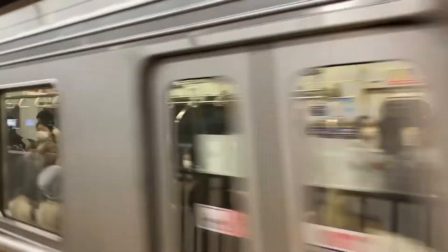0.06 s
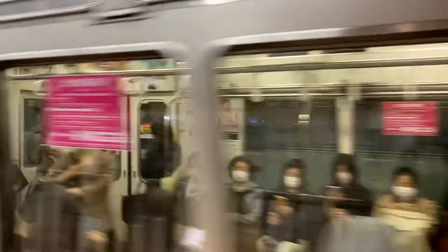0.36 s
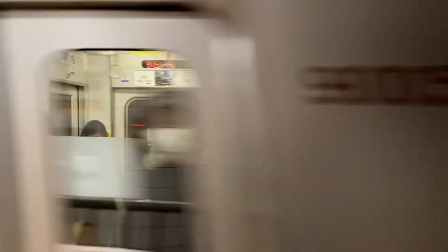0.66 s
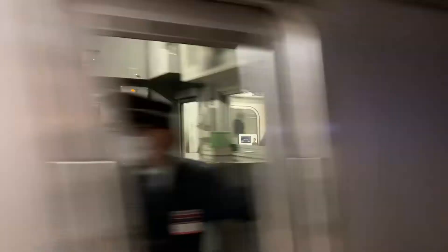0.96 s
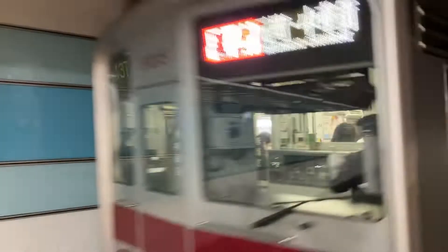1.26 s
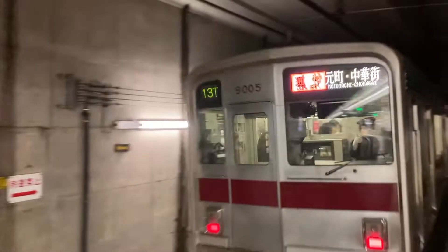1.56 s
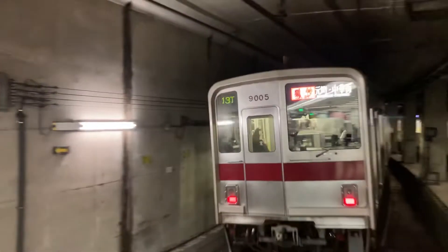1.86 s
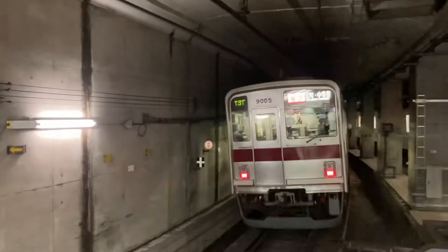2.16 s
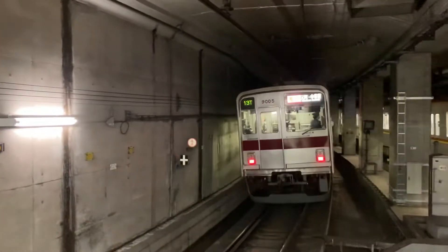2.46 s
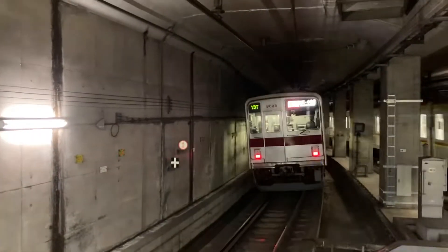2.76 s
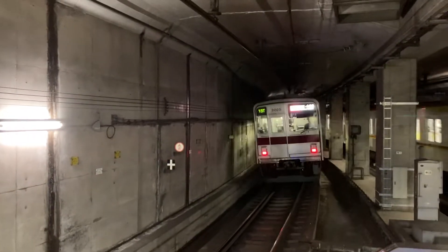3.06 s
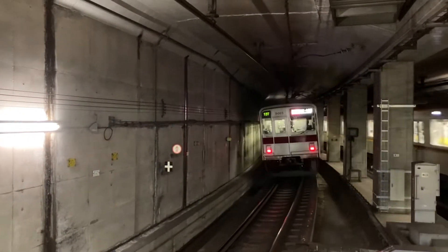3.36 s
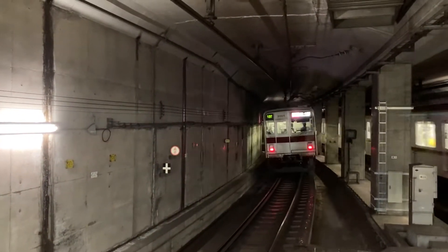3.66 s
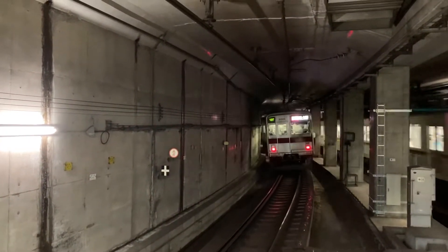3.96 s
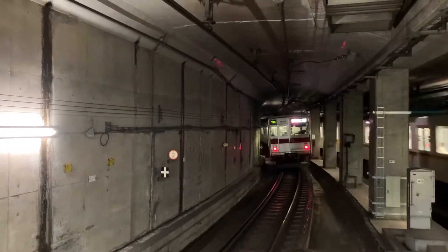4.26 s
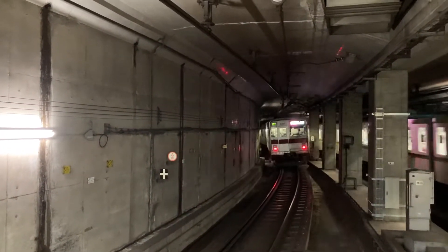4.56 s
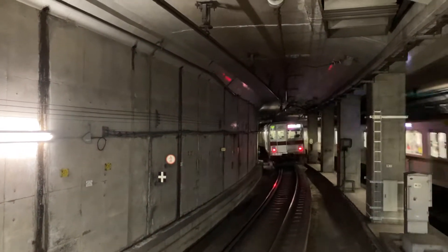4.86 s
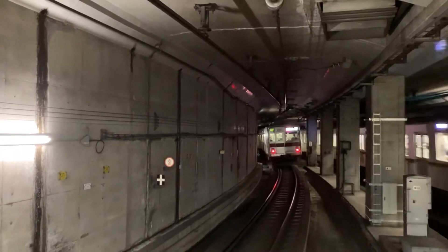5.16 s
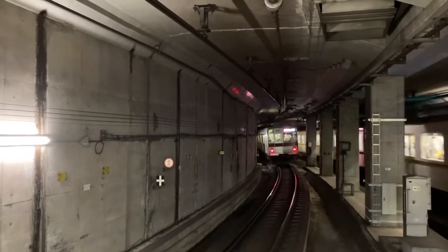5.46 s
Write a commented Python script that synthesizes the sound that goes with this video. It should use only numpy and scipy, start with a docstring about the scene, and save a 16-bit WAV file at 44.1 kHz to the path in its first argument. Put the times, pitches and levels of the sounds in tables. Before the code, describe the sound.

Roaring wheels, a pulsing motor hum and thin hiss echo underground as a subway train pulls away, dull thuds following.

```python
"""Electric train leaving an underground platform.

The train passes close by and recedes into the tunnel. Its wheels rumble and roar unevenly on the rails
and the track bed shudders. The drive's wavering hum near 520 Hz and its faint whine swell and sink in
the concrete tube, while a thin hiss arrives from the right. The tunnel mouth drones briefly behind
the last car; dull low thuds and brief, higher swells sound as the train draws away."""
import sys
import numpy as np
from scipy import signal
from scipy.fft import rfft, irfft, next_fast_len
from scipy.io import wavfile
from scipy.ndimage import uniform_filter1d

SR = 44100
rng = np.random.default_rng(int(sys.argv[2]) if len(sys.argv) > 2 else 0)


def waveform_to_disk(signal):
    """Save audio, clipped to [-1, 1], as 16-bit WAV at the path in sys.argv[1]."""
    frames = np.transpose(np.atleast_2d(signal))
    scaled = np.clip(frames, -1, 1) * 32767
    samples = np.round(scaled).astype(np.int16)
    wavfile.write(sys.argv[1], SR, samples)


N = 242991
TIME = np.arange(N) / SR
# The tail passes at PASS_S at a steady speed. The tunnel guides the sound: it fades slowly past REACH_M.
PASS_S, SPEED_M_PER_S, REACH_M = 1.539, 14.8, 13


def gain_of(db):
    """Decibels to a factor."""
    return 10 ** (np.asarray(db) / 20)


def unit_rms(x):
    """Scales to rms 1."""
    return x / np.sqrt(np.mean(abs(x) ** 2) + 1e-20)


def curve_at(points, hz):
    """Reads a curve on a log-frequency axis."""
    point_hz, value = np.transpose(points)
    return np.interp(np.log(hz + 1), np.log(point_hz + 1), value)


def follow(rows):
    """A fader ride at every sample."""
    return np.interp(TIME, *np.transpose(rows))


def bump(peak_s, half_s, t=TIME):
    """A smooth swell of height 1."""
    return np.exp(-((t - peak_s) / half_s) ** 2)


def doublings(t=TIME):
    """How often the distance to the train has doubled since its tail passed."""
    return np.log2(np.hypot(1, SPEED_M_PER_S * np.maximum(t - PASS_S, 0) / REACH_M))


def passing(near_db, swell_db, delay_s, half_s, loss_db, t=TIME):
    """Pass-by curve in dB: a swell delay_s after the tail passes, loss_db off per doubling of distance."""
    return near_db + swell_db * bump(PASS_S + delay_s, half_s, t) - loss_db * doublings(t)


def flutter(slow_hz, fast_hz, count=20):
    """A random waver of rms 1."""
    t = TIME[::100]
    waves = np.sin(2 * np.pi * (np.geomspace(slow_hz, fast_hz, count) * t[:, None] + rng.random(count)))
    return np.interp(TIME, t, unit_rms(waves.sum(1)))


def wavering(x, depth, slow_hz, fast_hz):
    """Lets the pitch wander; depth is the rms share of the pitch."""
    drift_s = np.cumsum(depth * flutter(slow_hz, fast_hz)) / SR
    return np.array([np.interp(TIME + drift_s, TIME, channel) for channel in x])


def steadied(x, share, size):
    """Irons out a share of a noise's chance swells, over a window of size samples."""
    power = uniform_filter1d((x ** 2).mean(0), size=size) + 1e-9
    return unit_rms(x / power ** (share / 2))


def noise_pair(hz, shape):
    """Random spectra at two microphones in a diffuse field: alike in the bass, unrelated higher up."""
    # Each row: frequency in Hz, left-right correlation.
    likeness = [(50, 0.5), (120, 0.901), (280, 0.92), (420, 0.88), (600, 0.5), (800, 0.468), (1200, 0.24),
                (1800, 0.25), (3000, -0.15), (4200, 0.317), (6000, -0.18)]
    # The mids reach the left a little late. Each row: frequency in Hz, left's phase lead in radians.
    left_lead = [(600, -0.063), (1200, -0.74), (1550, -1.9), (2300, -1.4), (3000, -0.14)]
    a, b, c, d = rng.standard_normal((4,) + shape)
    left, unrelated = a + 1j * b, c + 1j * d
    same = curve_at(likeness, hz)
    right = same * left * np.exp(-1j * curve_at(left_lead, hz)) + np.sqrt(1 - same ** 2) * unrelated
    return np.array([left, right])


def wash(spectrum, patchy_db, tilt=None, size=2048):
    """A stereo noise bed with drifting patches of colour and an optional pass-by treble tilt."""
    hop = size // 4
    hz, t = np.fft.rfftfreq(size, 1 / SR), np.arange(0, N + size, hop) / SR
    patches = rng.standard_normal((len(t), len(hz)))
    patches = unit_rms(uniform_filter1d(uniform_filter1d(patches, size=9, axis=0), size=12, axis=1))
    colour_db = curve_at(spectrum, hz) + patchy_db * patches
    if tilt:
        treble_octaves = np.log2(np.maximum(hz / 8000, 1))
        colour_db += passing(**tilt, t=t)[:, None] * treble_octaves
    skirt = np.maximum(hz / spectrum[-1][0], 1) ** -4  # 24 dB an octave above the last point
    frames = noise_pair(hz, patches.shape) * gain_of(colour_db) * skirt
    _, bed = signal.istft(frames.swapaxes(1, 2), nperseg=size, noverlap=size - hop)
    return unit_rms(bed[:, :N])


def ring(modes):
    """Resonances kept ringing by random forces."""
    count = next_fast_len(N)
    hz = np.fft.rfftfreq(count, 1 / SR)
    power = sum(gain_of(db) ** 2 / width / (1 + (2 * (hz - centre) / width) ** 2) ** 2
                for centre, width, db in modes)
    return unit_rms(irfft(noise_pair(hz, hz.shape) * np.sqrt(power), count)[:, :N])


def widened(x, side_db):
    """Stereo width: scales what the two channels do not share."""
    mid = x.mean(0)
    return mid + (x - mid) * gain_of(side_db)


def placed(x, left_db, before_db=-0.1, far_db=1.34):
    """Pans gently left with the leaving train, offset by left_db."""
    gone = .5 + .5 * np.tanh(SPEED_M_PER_S * (TIME - PASS_S) / REACH_M)
    lean_db = before_db + (far_db - before_db) * gone + left_db
    return x * gain_of([lean_db / 2, -lean_db / 2])


def rumble():
    """The low end of the rolling wheels; it widens once the car sides no longer shut out the tunnel."""
    # Each row: frequency in Hz, relative density in dB.
    spectrum = [(30, -16), (60, -7), (85, -2.5), (105, -4.5), (130, 3), (170, 0.5), (220, 4), (300, 2.5),
                (380, -11.5), (600, -44)]
    bed = steadied(wash(spectrum, patchy_db=1.5, size=4096), share=0.306, size=4000)
    bed *= gain_of(passing(-26, swell_db=0, delay_s=1.47, half_s=0.8, loss_db=1.1))
    return placed(widened(bed, side_db=-0.5 + 3.5 * doublings()), left_db=-0.77)


def roar(wheel_round_m=2.646, throb_peak_s=4.3):
    """Rough wheels roar on rough rails and, far off, throb once per turn."""
    # Each row: frequency in Hz, relative density in dB.
    spectrum = [(150, -28), (260, -11), (320, -2), (355, 4), (385, 1), (440, 6), (482, 1), (550, -4),
                (620, -10.5), (760, -30), (1100, -65.5)]
    # The roar surges briefly and unevenly.
    # Each row: peak time in seconds, boost in dB, half length in seconds.
    surges = [(0.857, 3, 0.033), (1.061, 0.5, 0.026), (1.437, 2, 0.04), (1.53, 5, 0.0344),
              (1.683, 0, 0.022), (1.811, 2.5, 0.03), (1.981, 0.5, 0.028), (2.193, 4, 0.019),
              (2.436, 3.5, 0.04), (3.267, 1.5, 0.058)]
    surge_db = sum(db * bump(peak_s, half_s) for peak_s, db, half_s in surges)
    turns = (TIME - throb_peak_s) * SPEED_M_PER_S / wheel_round_m
    throb_db = 2.5 * np.clip(doublings() - 1, 0, 1) * np.cos(2 * np.pi * turns)
    level_db = passing(-21.5, swell_db=2.5, delay_s=0.1, half_s=0.87, loss_db=0.85)
    bed = steadied(wash(spectrum, patchy_db=2.0), share=0.53, size=4000)
    return placed(bed, left_db=0.71) * gain_of(level_db + throb_db + surge_db)


def treads():
    """The wheel treads give the top of the roar, which fades soonest."""
    # Each row: frequency in Hz, relative density in dB.
    spectrum = [(420, -24.5), (540, 0), (610, 0.5), (720, -2), (850, -8.5), (1200, -16)]
    level_db = passing(-26.5, swell_db=2.8, delay_s=-0.1, half_s=0.1, loss_db=3.4)
    return placed(wash(spectrum, patchy_db=1.5), left_db=0.71) * gain_of(level_db)


def rasp():
    """The bright, gritty edge of wheel on rail."""
    # Each row: frequency in Hz, relative density in dB.
    spectrum = [(400, -25), (600, 3.5), (740, 1), (900, -1), (1050, -5), (1250, -6), (1520, -10),
                (1750, -12), (2300, -12.5), (2900, -16), (3500, -21), (5000, -23.5), (6500, -32.5),
                (8000, -66)]
    level_db = passing(-25, swell_db=1.1, delay_s=-0.55, half_s=0.55, loss_db=1.54)
    return placed(wash(spectrum, patchy_db=1.85), left_db=0.97) * gain_of(level_db)


def shudder():
    """The weight of the cars shakes the track bed: a narrow sub layer with a few slow heaves."""
    # Each row: frequency in Hz, relative density in dB.
    spectrum = [(15, -48), (28, -19), (45, -7.5), (62, 1), (85, -4)]
    # Each row: peak time in seconds, level of the added heave in dB, half length in seconds.
    heaves = [(.85, -44, 0.3), (2.0, -39.5, 0.18), (3.948, -33, 0.23), (5.25, -46, .12)]
    sub = widened(wash(spectrum, patchy_db=0.5, size=4096), side_db=-7)
    strength = gain_of(-44) + sum(gain_of(db) * bump(peak_s, half_s) for peak_s, db, half_s in heaves)
    return sub * strength * gain_of(2.2 * flutter(slow_hz=2.12, fast_hz=4.6))


def hum():
    """The drive hums near 520 Hz; close tones, smeared by the tunnel, waver and beat together."""
    # Each row: pitch in Hz, width in Hz, relative level in dB.
    modes = [(511.64, 15, -2.5), (524.5, 37, 3), (546.2, 11.4, -4), (563, 58, -8.5)]
    # The hum swells and sinks. Each row: time in seconds, level in dB.
    ride = [(0, -23.5), (.28, -22.5), (.43, -30), (.53, -18.5), (.66, -31), (.75, -14.5), (.93, -27),
            (1.07, -16.5), (1.17, -34), (1.29, -19), (1.42, -26), (1.6, -23), (1.72, -18), (1.84, -22.5),
            (1.98, -13.5), (2.16, -33), (2.27, -21), (2.42, -22.5), (2.63, -22), (2.75, -28), (2.82, -22),
            (2.95, -23), (3.06, -20.5), (3.14, -25.5), (3.28, -22), (3.36, -31), (3.44, -23.5), (3.65, -20),
            (3.8, -19), (3.89, -29.5), (4.02, -22.5), (4.15, -15.5), (4.25, -20.5), (4.35, -18.5),
            (4.44, -27.5), (4.56, -20), (4.7, -21.5), (4.78, -28), (4.93, -18.5), (5.02, -27), (5.1, -24),
            (5.23, -21), (5.31, -27.5), (5.44, -18.5), (5.51, -25.5)]
    tone = wavering(ring(modes), depth=0.0058, slow_hz=2, fast_hz=7)
    return placed(steadied(tone, share=0.85, size=6000), left_db=-0.5) * gain_of(follow(ride))


def whine():
    """The drive's upper partials: a main band flares and wobbles between two fainter ones."""
    # The three bands. Each row: pitch in Hz, width in Hz, relative level in dB.
    low_modes = [(2078, 92, 0)]
    main_modes = [(2553, 61, 0.003), (2619, 47, 0)]
    high_modes = [(3115, 70, 0)]
    # The main band's flares. Each row: time in seconds, level in dB.
    ride = [(0, -37), (.4, -43), (.85, -41), (1.2, -44), (1.29, -35.5), (1.37, -39.5), (1.45, -38.5),
            (1.8, -36), (1.95, -42.5), (2.35, -45.5), (2.56, -37.5), (2.65, -37.5), (2.85, -41),
            (3.05, -42.5), (3.35, -40.5), (3.47, -40.5), (3.55, -38), (3.85, -41), (4.03, -39), (4.14, -39),
            (4.3, -36.5), (4.43, -42), (4.5, -35), (4.6, -40), (4.67, -40), (4.75, -35.5), (4.82, -42),
            (5.15, -39), (5.51, -42)]
    main = steadied(ring(main_modes), share=0.86, size=6000)
    main *= gain_of(follow(ride) + 1.4 * flutter(slow_hz=6, fast_hz=17))
    low_db = passing(-41.5, swell_db=1, delay_s=0.5, half_s=2.3, loss_db=0.47)
    low = ring(low_modes) * gain_of(low_db + 1.73 * flutter(slow_hz=4, fast_hz=9.6))
    high = ring(high_modes) * gain_of(passing(-45.3, swell_db=1, delay_s=2, half_s=0.5, loss_db=2.11))
    return placed(wavering(low + main + high, depth=0.0049, slow_hz=2.5, fast_hz=9), left_db=-0.5)


def rails():
    """The rails sing faintly in their own modes and keep singing behind the train."""
    # Each row: pitch in Hz, width in Hz, relative level in dB.
    modes = [(1049, 95, 3.5), (1377, 89, -3), (1546.3, 140, -3), (1900, 260, -6.5)]
    level_db = passing(-36.3, swell_db=3, delay_s=-0.2, half_s=0.35, loss_db=-0.5)
    return placed(ring(modes), left_db=1.0) * gain_of(level_db)


def hiss(lag_ms=0.237, port_turns=0.31, scatter_share=0.0267):
    """A thin hiss from the right reaches the left microphone later, with a little scatter."""
    # Each row: frequency in Hz, relative density in dB.
    spectrum = [(2500, 3.5), (5000, 3), (6200, 5.3), (7200, 6.8), (8300, 6), (9700, 4.3), (11000, 2.4),
                (16000, -8)]
    # Each row: time in seconds, level in dB.
    ride = [(0, -42.5), (.8, -40), (1.15, -41.5), (1.4, -39.5), (1.75, -42), (2.3, -45), (3, -42.5),
            (4.05, -42.5), (4.5, -47), (5, -49), (5.51, -47)]
    # Brighter as the tail passes, duller with distance, in dB per octave above 8 kHz.
    tilt = dict(near_db=0, swell_db=6, delay_s=-0.2, half_s=0.4, loss_db=3.5)
    right, scatter = (wash(spectrum, patchy_db=1.44, tilt=tilt, size=512)[0] for _ in range(2))
    # The microphone ports add a phase shift of their own.
    lag_turns = np.fft.rfftfreq(N, 1 / SR) * lag_ms / 1000 + port_turns
    late = irfft(rfft(right) * np.exp(-2j * np.pi * lag_turns), N)
    left = np.sqrt(1 - scatter_share) * late + np.sqrt(scatter_share) * scatter
    return steadied(np.array([left, right]), share=0.5, size=8000) * gain_of(follow(ride))


def drone(start_s=1.778, attack_s=0.4, fade_at_s=3.15, release_s=0.16):
    """The tunnel mouth's hollow low note rises after the last car enters, holds and dies away."""
    # Each row: pitch in Hz, width in Hz, relative level in dB.
    modes = [(182, 64, -1), (227.3, 31, 2)]
    swell = np.clip(np.minimum((TIME - start_s) / attack_s, 1 - (TIME - fade_at_s) / release_s), 0, 1)
    note = steadied(widened(ring(modes), side_db=-3), share=0.44, size=4000)
    return note * swell * gain_of(-32.3)


def thuds_and_swells(overtone_ratio=1.95, deep_hz=70):
    """Dull low thuds and brief, higher swells, each at one pitch; the deep ones add a puff of noise."""
    # Each row: start in seconds, relative level in dB, rise in seconds, pitch in Hz, overtone in dB.
    pulses = [(2.265, -19, 0.022, 250, -12), (2.49, -17, .03, 204.6, -3), (2.615, -26.5, 0.0334, 70.3, 4),
              (3.045, -17.5, .035, 234.4, -6), (3.165, -22, 0.035, 61, -1), (3.36, -25.5, 0.028, 65, 5),
              (3.535, -17.5, 0.025, 76.5, -6), (3.715, -17.5, 0.056, 58.14, -9),
              (3.852, -15, 0.0245, 79.98, -6), (4.012, -12, 0.038, 59.9, -2.5),
              (4.145, -27, 0.025, 64.74, -3), (4.29, -15.5, 0.028, 335, -14),
              (4.61, -16.5, 0.018, 370, -12), (5.165, -22, 0.0485, 68, -1.5), (5.29, -26, 0.037, 76.1, 3)]
    # Each row: frequency in Hz, relative density in dB.
    puff_spectrum = [(20, -33), (40, -23), (60, -2), (85, 8.5), (120, 0), (170, -13.5), (300, -29)]
    tones, puff_power = np.zeros(N), np.zeros(N)
    phases = rng.uniform(0, 2 * np.pi, (len(pulses), 2))
    for (start_s, db, rise_s, hz, overtone_db), (phase, overtone_phase) in zip(pulses, phases):
        age = np.maximum(TIME - start_s, 0) / rise_s
        swell = gain_of(db) * (age * np.exp(1 - age)) ** 2
        angle = 2 * np.pi * hz * TIME
        overtone = gain_of(overtone_db) * np.sin(overtone_ratio * angle + overtone_phase)
        tones += swell * (np.sin(angle + phase) + overtone)
        puff_power += (swell * min(deep_hz / hz, 1) ** 2) ** 2
    puff = steadied(wash(puff_spectrum, patchy_db=3.5, size=4096), share=0.76, size=1300)
    return tones * gain_of(-7.0) + puff * np.sqrt(puff_power) * gain_of(-12.5)


def scene():
    """The stereo mix of wheels, track, drive and tunnel."""
    rolling = rumble() + roar() + treads() + rasp()
    return rolling + shudder() + drone() + hum() + whine() + rails() + hiss() + thuds_and_swells()


def record(dry):
    """A steep high cut at 15.8 kHz."""
    high_cut = signal.firwin(1023, 15800, window=("kaiser", 9), fs=SR)
    return signal.oaconvolve(dry, high_cut[None], "same")


dry = scene()
out = record(dry)
waveform_to_disk(out)
```